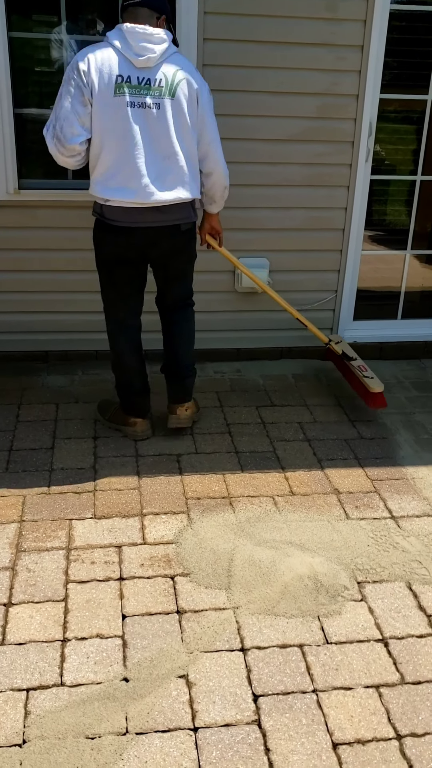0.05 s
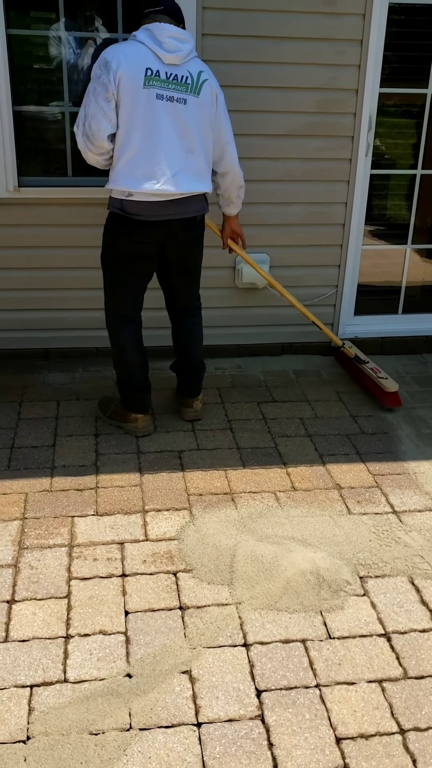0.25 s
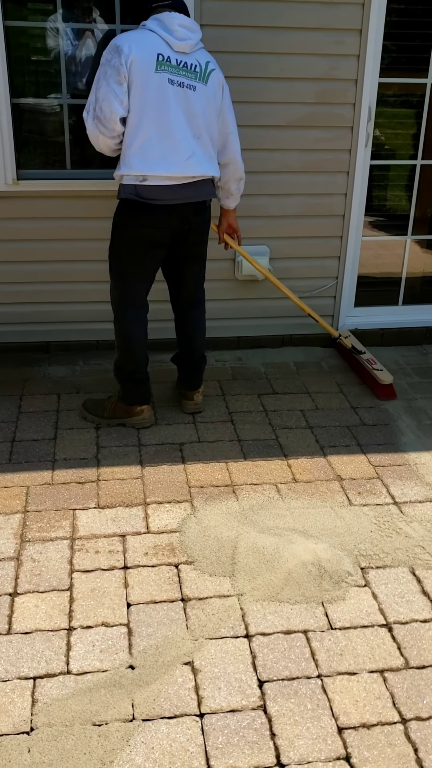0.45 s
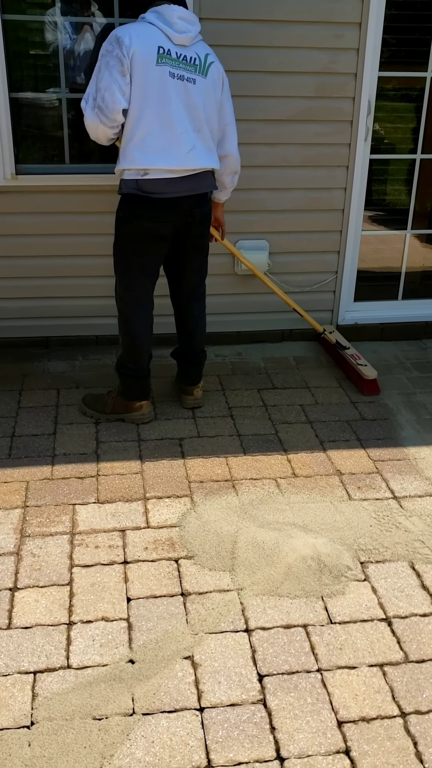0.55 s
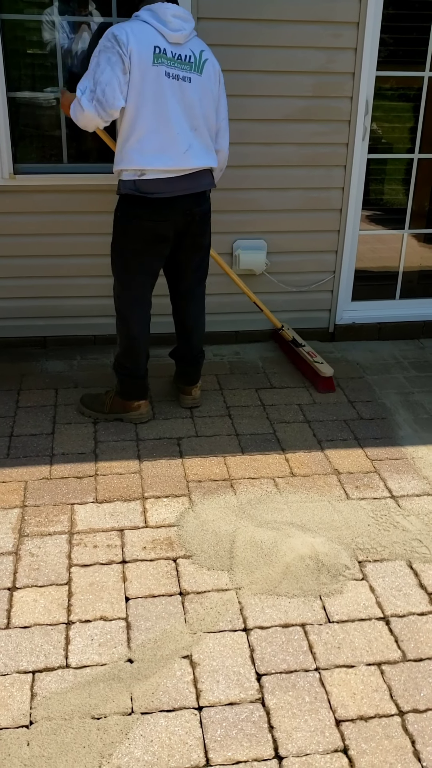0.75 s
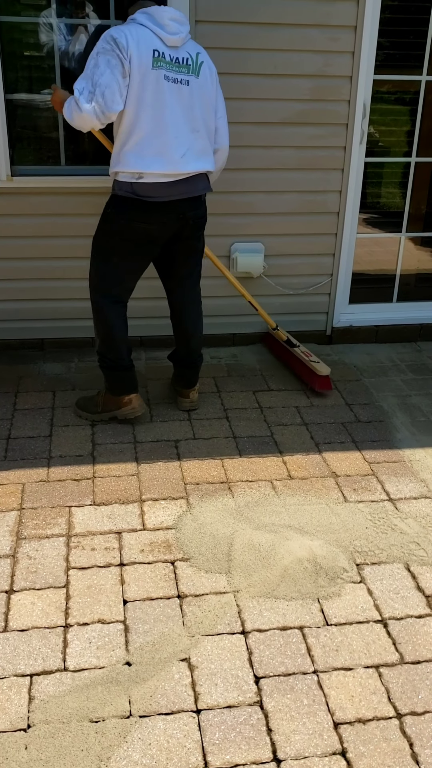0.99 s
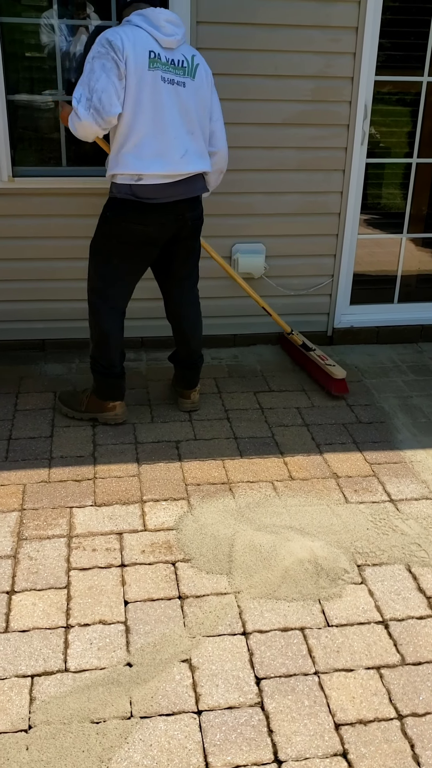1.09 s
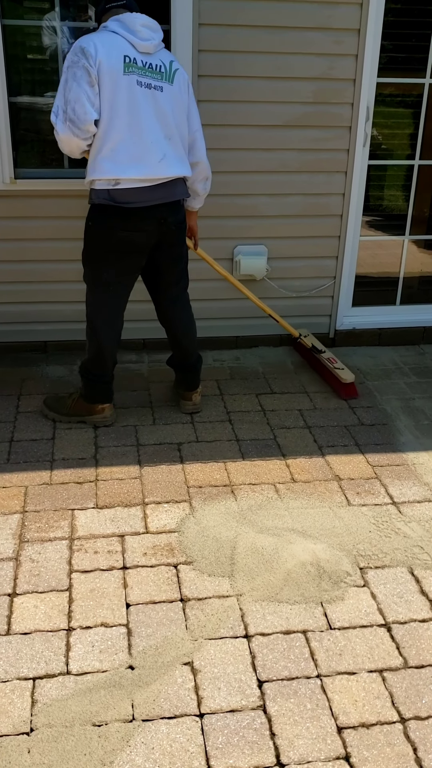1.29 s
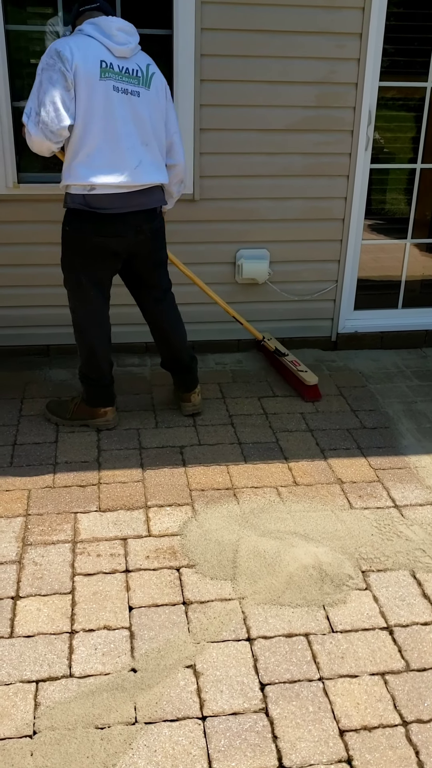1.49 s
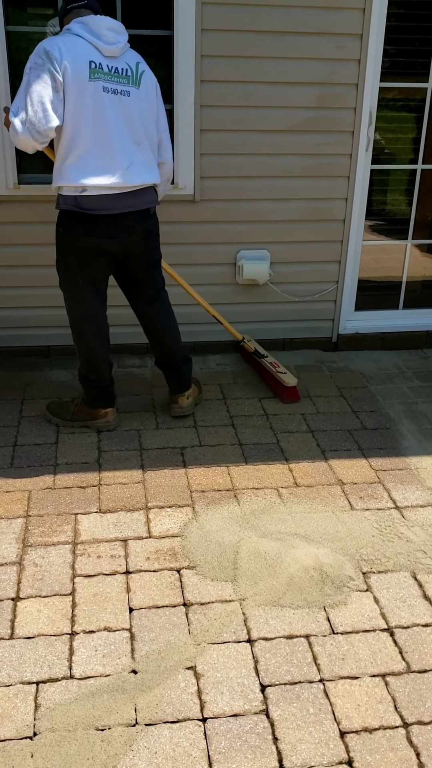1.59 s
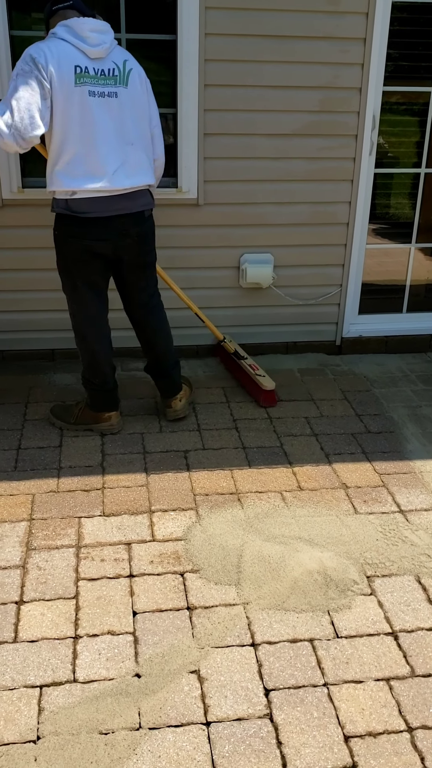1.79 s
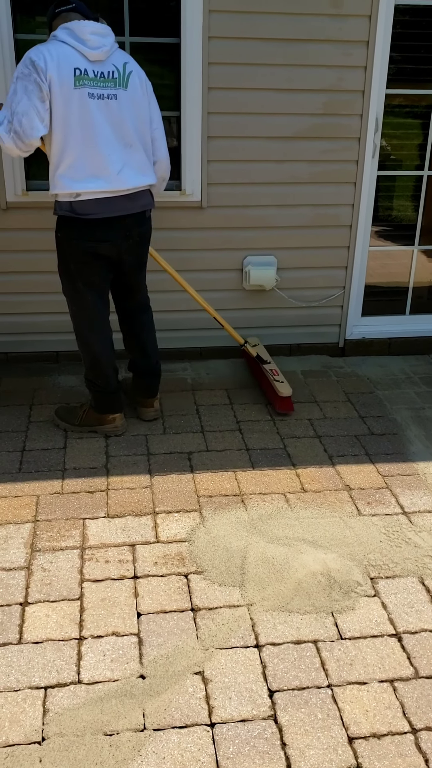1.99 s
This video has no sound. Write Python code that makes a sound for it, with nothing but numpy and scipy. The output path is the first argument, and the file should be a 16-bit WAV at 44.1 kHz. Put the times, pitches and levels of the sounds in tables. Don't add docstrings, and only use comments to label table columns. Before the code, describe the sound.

A stiff broom pushes sand over pavers: boots crunch grit, the wooden block knocks once, then two long raspy strokes follow, while a bird trills quickly over faint traffic rumble; close stereo outdoors, brighter on the left.

```python
import sys
import numpy as np
from scipy import signal
from scipy.fft import rfft, irfft
from scipy.io import wavfile
from scipy.ndimage import uniform_filter1d

SR = 44100
rng = np.random.default_rng(int(sys.argv[2]) if len(sys.argv) > 2 else 0)


def how_loud(loudness_db):
    steps = np.asarray(loudness_db, float) / 20
    return 10 ** steps


def int16_out(signal):
    q = np.round(np.clip(np.atleast_2d(signal).T, -1, 1) * 32767)
    wavfile.write(sys.argv[1], SR, q.astype(np.int16))


N = 90404
T = np.arange(N) / SR

# frequency in Hz, level in dB.
AIR_COLOUR = [(60, -5.5), (330, -2), (520, -6.5), (820, -7.5), (1150, -8.5), (1600, -14), (2700, -12.5),
              (3600, -28.5), (7500, -21.5), (8300, -28)]
# frequency in Hz, level in dB.
RUMBLE_COLOUR = [(25, -27), (40, -9.5), (60, 0.5), (85, -1.5), (120, -10), (200, -19)]
# time in seconds, level in dB.
FAR_SCRAPE_SWELL = [(0, -68), (.9, -100), (1.03, -57), (1.12, -52), (1.2, -54.5), (1.3, -61), (2.05, -87)]
# frequency in Hz, level in dB.
FAR_SCRAPE_COLOUR = [(700, -7.5), (1300, -8.5), (2600, -5), (3600, -10.5), (4300, -16)]
# time in seconds, level in dB.
FLOCK_SWELL = [(0, -70), (.11, -70), (.15, -75), (.3, -78), (.5, -73), (1.0, -72), (1.15, -66), (1.3, -71),
               (1.9, -74), (1.96, -82), (2.05, -84)]
# frequency in Hz, level in dB.
FLOCK_COLOUR = [(4200, -25), (5000, 4), (6200, -3), (7500, -1), (8000, -33)]
# time in seconds, level in dB.
LEAVES_SWELL = [(0, -77), (.35, -88), (1.0, -81), (1.1, -103), (1.2, -105), (1.3, -87), (2.05, -79.5)]
# time in seconds, level in dB.
DRONE_SWELL = [(0, -61), (.3, -58), (.5, -57.5), (.7, -66), (2.05, -80)]
# frequency in Hz, level in dB.
DRONE_COLOUR = [(600, -9), (780, 4), (900, 1.5), (1150, -12)]

# time in seconds, pressure in dB, fine-sand brightness over pressure in dB.
STROKES = [
    [(.42, -58.5, -1), (.49, -59.5, -12.5), (.53, -63.5, -13), (.57, -51, -14.5), (.67, -49, -6),
     (.8, -45, -8.5), (.86, -45.5, -7.5), (.96, -57, -13.5), (1.03, -64.5, -16)],
    [(1.25, -51, -25), (1.31, -55.5, -12), (1.385, -61.5, -6)],
    [(1.37, -67.5, -5), (1.43, -51.5, -11.5), (1.5, -46, -13), (1.56, -46, -8.5), (1.66, -45, -6.5),
     (1.77, -46.5, -7.5), (1.86, -57, -13.5), (1.91, -63, -9), (1.95, -76, -6)],
    [(-.03, -59, -25), (.05, -66, -21), (.13, -71, -25), (.19, -67, -27)],
]
LOW_SCRAPE_DB = [-10.5, -10.5, -12, -25]
# frequency in Hz, level in dB.
LOW_SCRAPE_COLOUR = [(600, -22), (830, -1), (1100, -5), (1500, 0), (1800, -2)]
# frequency in Hz, level in dB.
BRISTLE_COLOUR = [(1200, -28), (1500, -19), (1950, -11.5), (2400, 0.5), (3000, -8.5), (3700, -13.5),
                  (7800, -12.5)]
# frequency in Hz, level in dB.
SAND_COLOUR = [(7000, -30), (8500, -9.5), (10500, -5), (12000, -3), (14300, -7), (16000, -10)]
# frequency in Hz, width in Hz, level in dB.
HEAD_RINGS = [(2320, 150, 0), (2680, 200, 0), (1850, 200, -5), (1480, 180, -8), (2950, 200, -4)]
# time in seconds, tilt in dB per kHz.
HEAD_TILT = [(.4, -4), (.62, 6), (.72, 12), (.88, -1), (1.4, -2), (1.65, 4), (1.9, -6)]

SCUFF_STARTS = [0.001, .1715, .2, .367, .4025, 1.047, 1.222, 1.245]
# rise in seconds, length in seconds, then levels in dB of fine grit,
# coarse grit, fizz and sole thump.
SCUFFS = [
    (0.0037, 0.03, -59.5, -61, -80, -54.5),
    (0.0017, 0.031, -42.5, -61, -72, -49.5),
    (0.018, 0.052, -43, -46.5, -60.5, -42),
    (0.0013, 0.028, -51, -53.5, -66.5, -65),
    (0.0045, 0.013, -42, -50, -54, -45),
    (0.0009, 0.0025, -77, -80, -61, -79),
    (0.003, 0.02, -43.5, -48.5, -72, -48.5),
    (0.0063, 0.046, -57, -53, -79, -53.5),
]
# frequency in Hz, level in dB.
FINE_GRIT_COLOUR = [(1200, -34), (1550, -1.5), (2100, -0.5), (2900, 0), (3600, -12.5), (4200, -13),
                    (7500, -16.5), (9000, -34)]
# frequency in Hz, level in dB.
COARSE_GRIT_COLOUR = [(450, -22), (650, -5), (900, 0.5), (1300, -6.5), (1600, -10)]
# frequency in Hz, level in dB.
SOLE_COLOUR = [(90, -53), (170, 3), (260, 5.5), (420, 4), (700, -13)]

# offset in seconds, length in seconds, from Hz, to Hz, level in dB.
TRILL_NOTES = [
    (0.0, .016, 7400, 4900, 1),
    (.015, .013, 4900, 3800, -5),
    (.021, .013, 7300, 5200, -2),
    (.034, .011, 5200, 4200, -9),
]
# start in seconds, length in seconds, pitch in Hz, level in dB.
WHISTLES = [
    (0.001, .03, 5700, -61),
    (.08, .025, 5950, -63),
    (.24, .038, 5660, -63),
    (.97, .02, 6000, -63),
    (.995, .05, 6030, -54),
    (.996, .05, 6530, -60),
    (1.0, .045, 7700, -68),
]

# start in seconds, peak in dB, pitch in Hz, T60 in seconds.
PEBBLES = [(0.22, -31, 238, 0.037), (.237, -29, 1950, 0.01), (0.21, -35, 3000, .015),
           (.187, -35.5, 1860, 0.031), (0.37, -36, 1700, 0.035), (0.38, -39, 2560, 0.033),
           (.373, -40, 1620, 0.031), (0.37, -40.5, 1250, 0.044), (0.4, -33, 1650, 0.019),
           (.4048, -35, 2840, 0.031), (.4075, -30.5, 2440, 0.029), (.409, -35.5, 1420, .02),
           (.466, -47, 2370, 0.049), (1.2226, -29, 1700, 0.0019), (1.2227, -49, 11000, 0.001),
           (.1722, -54, 12000, 0.0023), (.3675, -54, 13000, 0.0023), (.2075, -46, 200, 0.016),
           (.173, -38, 236, 0.046), (1.4, -37.5, 4230, 0.0047), (1.229, -39, 4730, .008),
           (1.2277, -39, 1530, 0.018), (1.2285, -38, 3100, 0.0068), (1.233, -36.5, 1420, 0.021),
           (1.2322, -32.5, 129, 0.054), (1.257, -48, 2400, 0.069)]

# frequency in Hz, level in dB, T60 in seconds.
BLOCK_RINGS = [(382, 1, 0.015), (428, -10.5, 0.032), (855, -6, 0.0053), (1323, -9, 0.01),
               (1494, -17.5, 0.023), (1860, -22.5, 0.028), (2460, -30, 0.038), (2880, -25, 0.024)]
# frequency in Hz, level in dB, T60 in seconds.
HOLLOW_RINGS = [(365.2, -12, 0.13), (444, -28, 0.062), (520, 7, 0.0328)]
# delay in seconds, level in dB.
BOUNCES = [
    (.0085, -34),
    (0.014, -14.5),
    (0.0256, -10.5),
    (.039, -30),
    (0.059, -39),
]

# frequency in Hz, likeness of the two ports from 0 to 1.
YARD_SAME = [(60, 0.97), (180, 0.93), (540, 0.68), (1630, 0.41), (4890, 0.017), (14700, 0.027)]
# frequency in Hz, likeness of the two ports from 0 to 1.
NEAR_SAME = [(60, 0.36), (180, 1), (540, 0.57), (1630, 0.67), (4890, 0.39), (14700, 0.067)]
# frequency in Hz, left over right in dB.
NEAR_LR = [(100, 2), (380, -3.5), (690, 7.5), (1270, -1.5), (2350, 8.5), (4330, 10), (8000, 13),
           (14000, 6.5)]
# frequency in Hz, left lead in radians.
NEAR_LEAD = [(300, 0.05), (1000, 0.26), (2200, 0.63), (4700, 1.5), (8000, 4.5), (12000, 3.0)]
# frequency in Hz, left over right in dB.
KNOCK_LR = [(100, -8), (200, 1.5), (380, -2.5), (690, 6), (1270, 1), (2350, 9), (4330, 13)]
# frequency in Hz, left lead in radians.
KNOCK_LEAD = [(150, .05), (350, 0.14), (600, 1.38), (1200, 0.82), (2500, 1.4)]
# frequency in Hz, gain in dB.
MIC = [(7500, 0.5), (7900, -6.5), (8300, -15), (9300, 1.5), (10300, -3.5), (11000, 1.5), (14500, 2.5),
       (14800, -72)]


def evened(x):
    return x / np.sqrt(np.mean(x ** 2) + 1e-20)


def drift(samples):
    return evened(uniform_filter1d(rng.standard_normal(N), size=samples))


def swell(points):
    return how_loud(np.interp(T, *np.transpose(points)))


def read(points, hz):
    f, value = np.transpose(points)
    return np.interp(np.log(hz + 1), np.log(f + 1), value)


def colour(x, points, edge_db=-36.0):
    hz = np.fft.rfftfreq(N, 1 / SR)
    below = (points[0][0] / 2, points[0][1] + edge_db)
    above = (points[-1][0] * 1.4, points[-1][1] + edge_db)
    shut = [below] + list(points) + [above]
    return evened(irfft(rfft(x) * how_loud(read(shut, hz)), N))


def resonate(x, hz, width):
    r = np.exp(-np.pi * width / SR)
    return signal.lfilter([1, 0, -1], [1, -2 * r * np.cos(2 * np.pi * hz / SR), r * r], x)


def grains(per_s, spread_db, flicker_db, flicker_s):
    clump = how_loud(flicker_db * drift(max(2, round(flicker_s * SR))))
    struck = rng.random((2, N)) < per_s / SR
    size = how_loud(spread_db * np.minimum(rng.exponential(1, (2, N)), 4))
    return clump * struck * size * rng.standard_normal((2, N))


def ports(pair, same, lr_db, lead):
    hz = np.fft.rfftfreq(N, 1 / SR)
    a, b = rfft(pair)
    likeness, lr = np.clip(read(same, hz), -1, 1), read(lr_db, hz)
    turned = a * np.exp(-1j * read(lead, hz))
    right = likeness * turned + np.sqrt(1 - likeness ** 2) * b
    lift = np.sqrt(2 / (1 + how_loud(-2 * lr)))
    return irfft(np.array([a * lift, right * lift / how_loud(lr)]), N)


def yard():
    air = how_loud(-57.5) * colour(grains(SR, 0, 1.0, 0.069), AIR_COLOUR)
    air += how_loud(-50.5) * colour(grains(SR, 0, 2.6, 0.044), RUMBLE_COLOUR)
    hum_hz = 327 + 2.72 * drift(2500)
    air += how_loud(-62) * np.sin(2 * np.pi * np.cumsum(hum_hz) / SR)
    far = swell(FAR_SCRAPE_SWELL) * colour(grains(9000, 3.1, 0.72, 0.096), FAR_SCRAPE_COLOUR)
    air += swell(FLOCK_SWELL) * colour(grains(SR, 0, 2.5, .03), FLOCK_COLOUR)
    air += swell(LEAVES_SWELL) * colour(rng.standard_normal((2, N)), SAND_COLOUR)
    air += swell(DRONE_SWELL) * colour(grains(SR, 0, 1.5, .03), DRONE_COLOUR)
    in_step = [(100, 0), (9000, 0)]
    around = ports(air, YARD_SAME, [(100, -0.5), (3000, 5.5)], in_step)
    return around + ports(far, YARD_SAME, [(100, -2.0), (9000, -0.93)], in_step)


def broom():
    level, bright, low = np.zeros((3, N))
    for rows, low_db in zip(STROKES, LOW_SCRAPE_DB):
        s, db, rel = np.transpose(rows)
        edge = np.clip(np.minimum(T - s[0], s[-1] - T) / 0.018, 0, 1)
        pressure = np.interp(T, s, db)
        level += edge * how_loud(pressure)
        low += edge * how_loud(pressure + low_db)
        bright += edge * how_loud(np.interp(T, s, db + rel))
    tips = grains(16000, 1.15, 1.05, 0.02)
    lean = np.interp(T, *np.transpose(HEAD_TILT))
    head = np.zeros((2, N))
    for hz, width, db in HEAD_RINGS:
        ring_db = db + lean * (hz - 2500) / 1000 + 2.0 * drift(1800)
        head += how_loud(ring_db) * evened(resonate(tips, hz, width))
    body = colour(tips, BRISTLE_COLOUR) + how_loud(-6.5) * evened(head)
    scrape = level * evened(body) + low * colour(tips, LOW_SCRAPE_COLOUR)
    fizz = bright * colour(grains(14000, 0.81, 0.37, 0.015), SAND_COLOUR)
    return how_loud(3) * scrape + how_loud(2.5) * fizz


def boots():
    shapes = np.zeros((4, N))
    for start, (rise, length, *dbs) in zip(SCUFF_STARTS, SCUFFS):
        u = T - start
        fade_db = -7.5 * np.clip((u - rise) / length, 0, 1)
        tail_db = -60 * np.maximum(u - length, 0) / 0.035
        shapes += np.clip(u / rise, 0, 1) * how_loud(fade_db + tail_db + np.array(dbs)[:, None])
    fine, coarse, fizz, thump = shapes
    grit = grains(12000, 1.2, 1.6, .004)
    crunch = fine * colour(grit, FINE_GRIT_COLOUR) + coarse * colour(grit, COARSE_GRIT_COLOUR)
    sole = thump * colour(rng.standard_normal((2, N)), SOLE_COLOUR)
    return crunch + fizz * colour(grit, SAND_COLOUR) + sole


def wall(x):
    t = np.arange(6000) / SR
    sparse = rng.standard_normal((2, 6000)) * (rng.random((2, 6000)) < .05)
    taps = sparse * how_loud(-60 * t / 0.15) * (t > .003)
    return signal.oaconvolve(x, taps / np.linalg.norm(taps, axis=1, keepdims=True), axes=1)[:, :N]


def birds(count=33):
    out = np.zeros(N)
    trill_s, step_s = .137, .0543
    for k, (vary, late) in enumerate(rng.standard_normal((count, 2))):
        for offset, length, from_hz, to_hz, db in TRILL_NOTES:
            u = np.arange(0, length, 1 / SR) / length
            hz = (from_hz + (to_hz - from_hz) * u ** .8) * (1 + .008 * late)
            at = round((trill_s + k * step_s + offset + 0.00027 * late) * SR)
            shape = min(1, (k + 1) / 7) * np.sin(np.pi * u) ** .6
            out[at:at + len(u)] += how_loud(-58.5 + db + 1.0 * vary) * shape * np.sin(2 * np.pi * np.cumsum(hz) / SR)
    flutter = 1 + .35 * drift(150)
    for start, length, hz, db in WHISTLES:
        shape = np.sin(np.pi * np.clip((T - start) / length, 0, 1)) ** 0.25
        out += how_loud(db) * flutter * shape * np.sin(2 * np.pi * hz * T)
    return out


def pebbles():
    out = np.zeros(N)
    for s, db, hz, t60 in PEBBLES:
        u = np.maximum(T - s, 0)
        push = np.minimum(u / .00012, 1)
        out -= push * how_loud(db - 60 * u / t60) * np.sin(2 * np.pi * hz * u)
    return out


def knock():
    press_s = 0.0037
    u = np.maximum(T - .5122, 0)

    def ring(modes, fall_s):
        return sum(how_loud(db - 60 * fall_s / t60) * np.sin(2 * np.pi * hz * u) for hz, db, t60 in modes)

    press = np.sin(np.pi / 2 * np.minimum(u / press_s, 1))
    blow = press * ring(BLOCK_RINGS, np.maximum(u - press_s, 0))
    out = -blow + np.minimum(u / 0.022, 1) * ring(HOLLOW_RINGS, u)
    dull = uniform_filter1d(blow, size=24)
    for delay, db in BOUNCES:
        out += how_loud(db) * np.roll(dull, round(delay * SR))
    return how_loud(-17) * out


def scene():
    both, alike = np.ones((2, 1)), [(100, 1.0), (9000, 1.0)]
    hits = boots()
    near = ports(broom() + hits + how_loud(-6.5) * wall(hits), NEAR_SAME, NEAR_LR, NEAR_LEAD)
    stones = pebbles() * both
    near += ports(stones + how_loud(-8.5) * wall(stones), alike, NEAR_LR, NEAR_LEAD)
    block = knock() * both
    near += ports(block + how_loud(-9.5) * wall(block), alike, KNOCK_LR, KNOCK_LEAD)
    song = birds() * both
    return near + yard() + song * how_loud(np.array([[1.5], [-1.5]])) + how_loud(-8.) * wall(song)


def low_pass(x):
    return signal.sosfilt(signal.butter(12, 15300, fs=SR, output="sos"), x)


def record(dry):
    response = how_loud(read(MIC, np.fft.rfftfreq(N, 1 / SR)))
    heard = irfft(rfft(dry) * response, N)
    return low_pass(heard)


dry = scene()
out = record(dry)
int16_out(out)
```